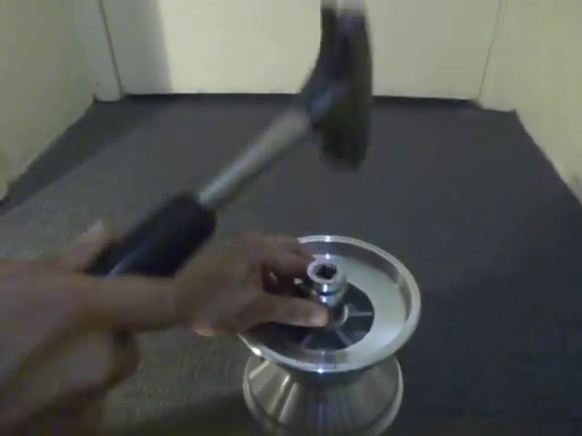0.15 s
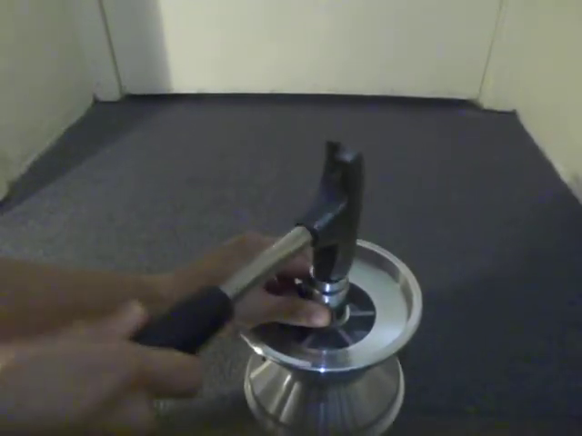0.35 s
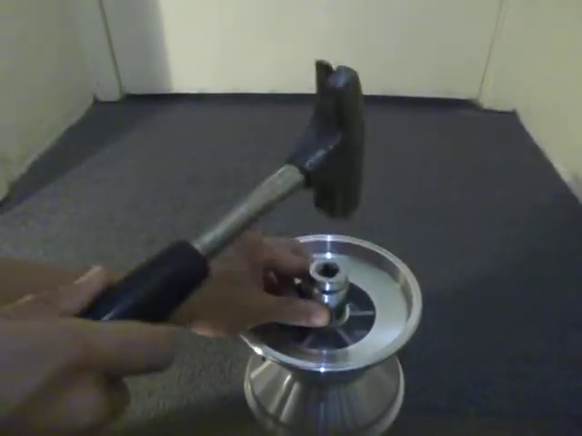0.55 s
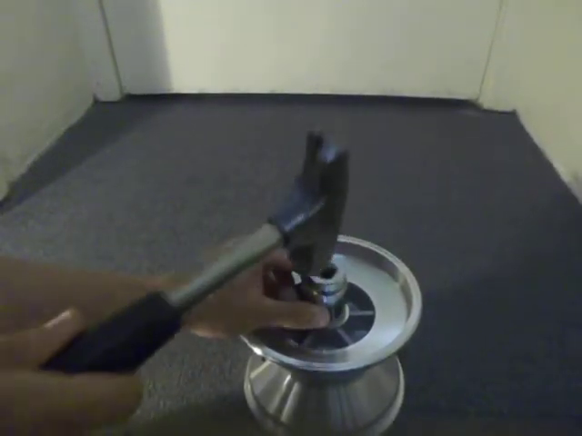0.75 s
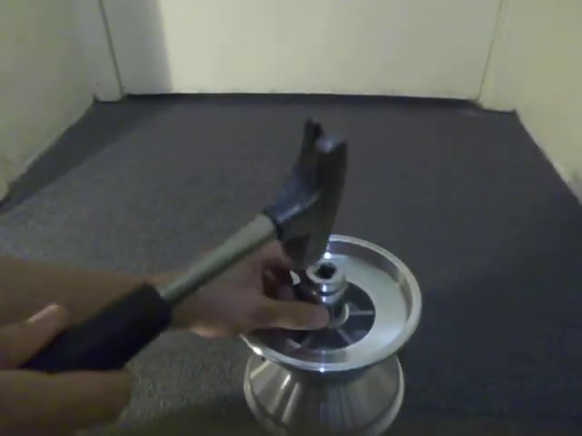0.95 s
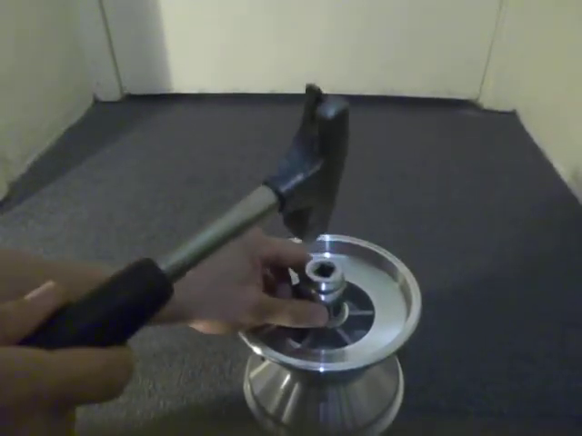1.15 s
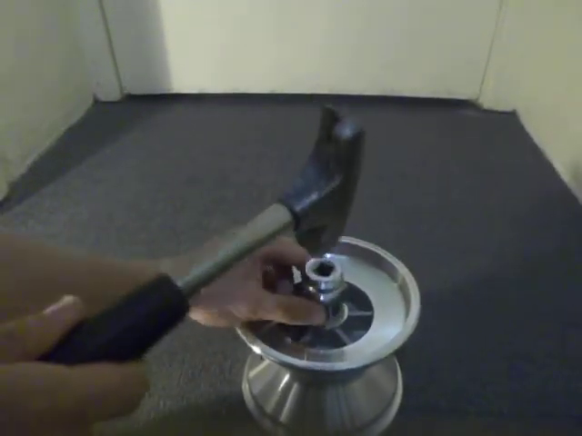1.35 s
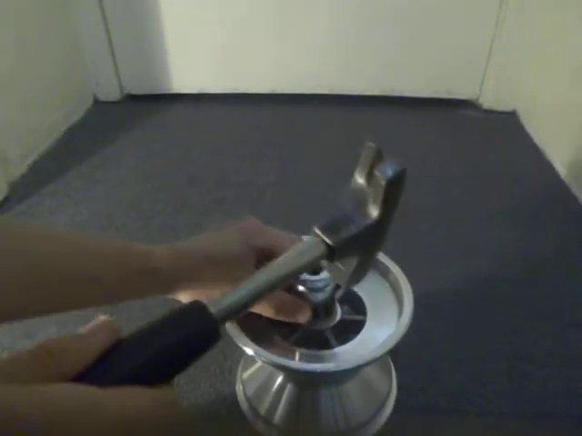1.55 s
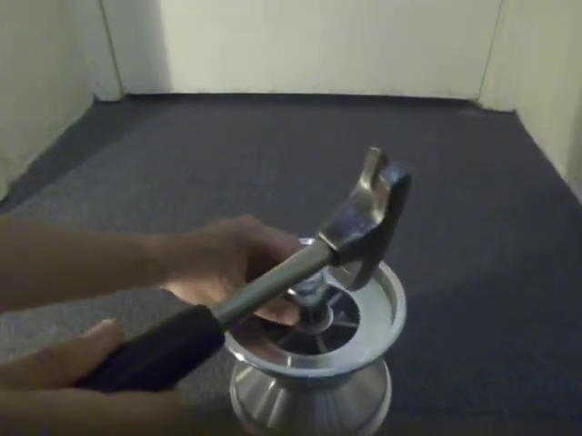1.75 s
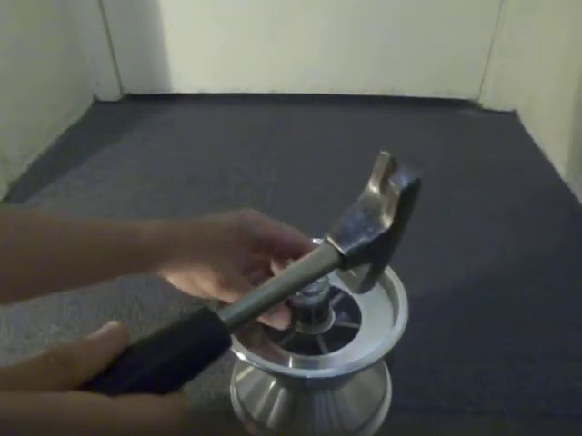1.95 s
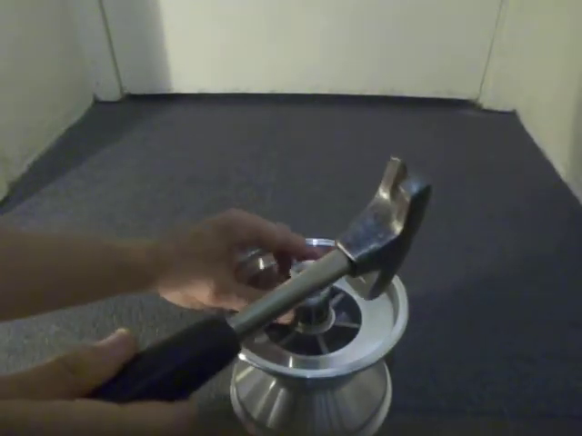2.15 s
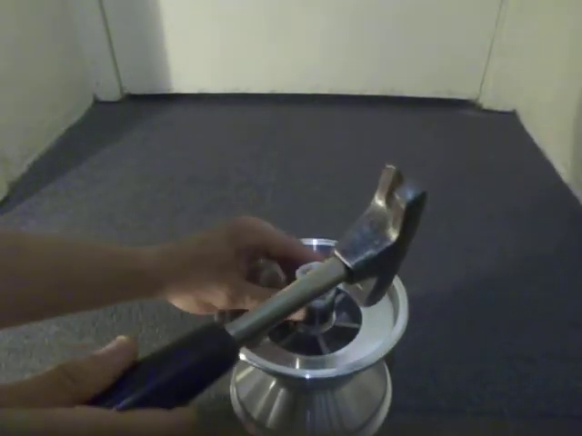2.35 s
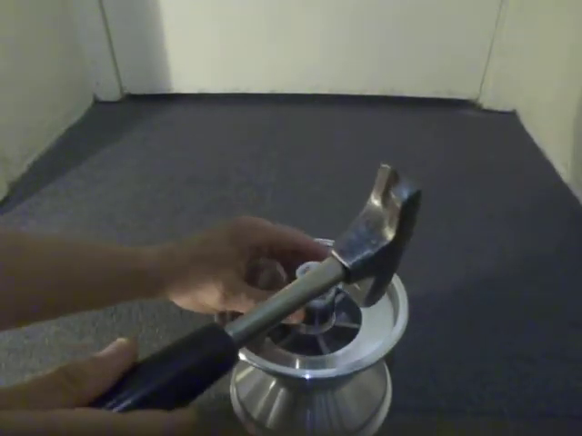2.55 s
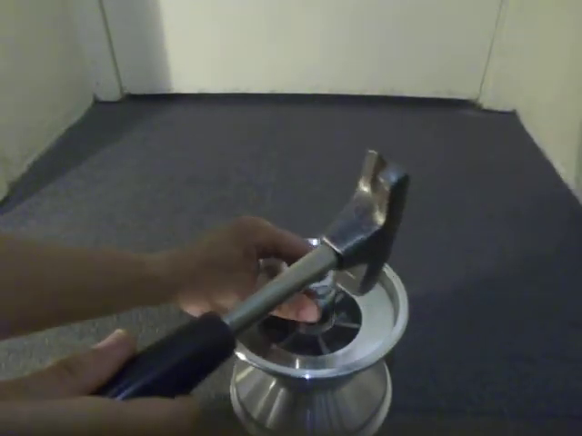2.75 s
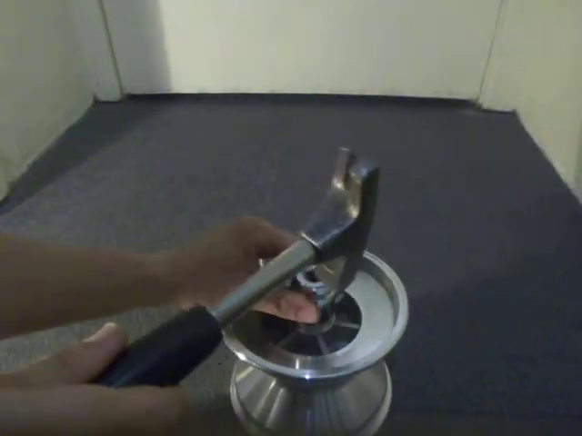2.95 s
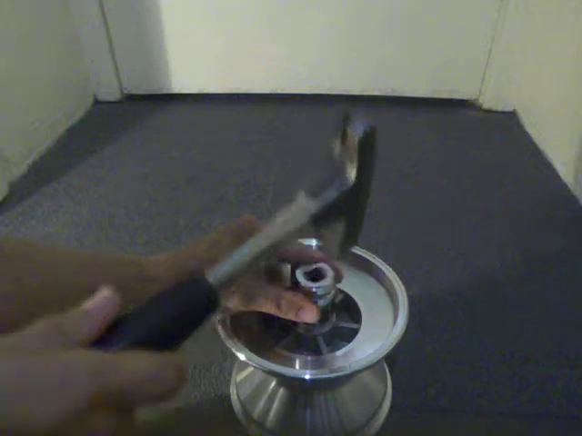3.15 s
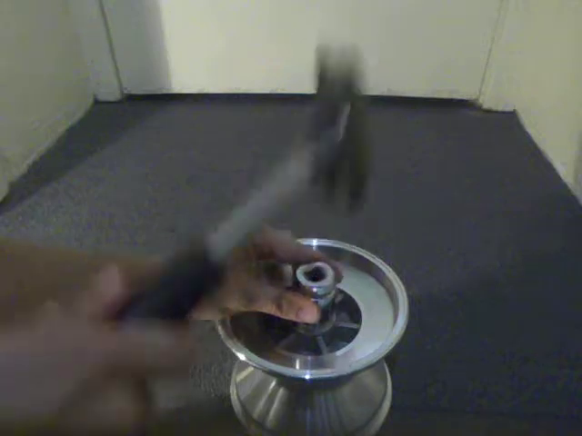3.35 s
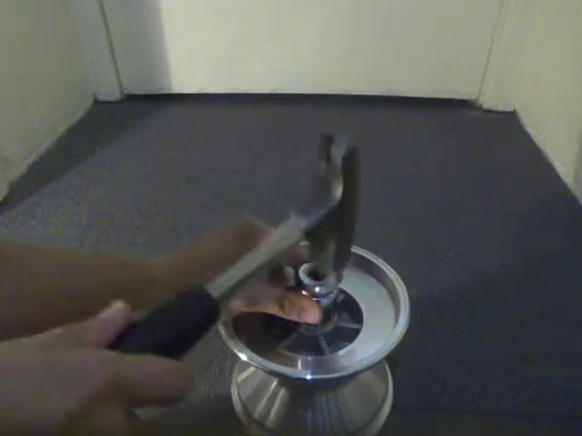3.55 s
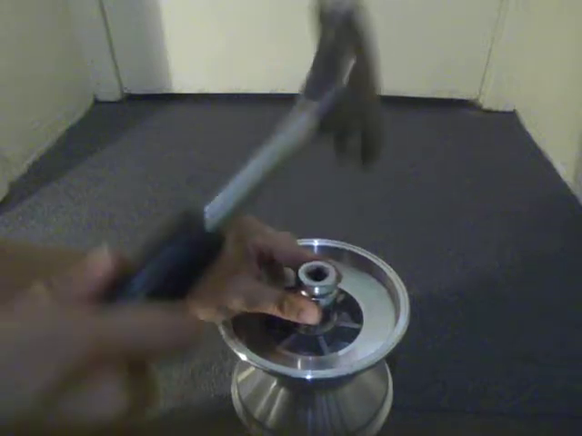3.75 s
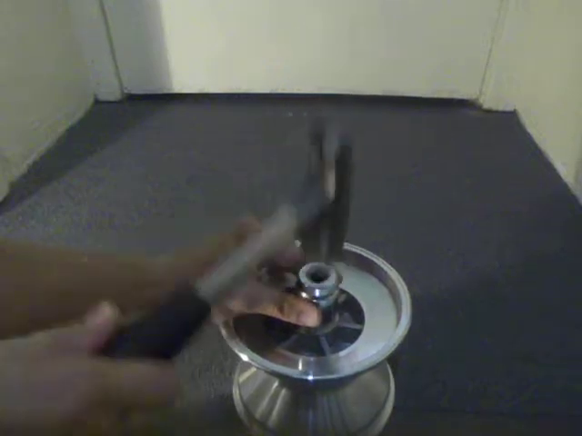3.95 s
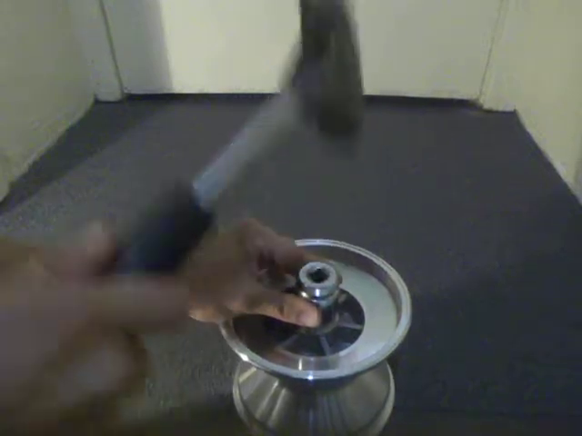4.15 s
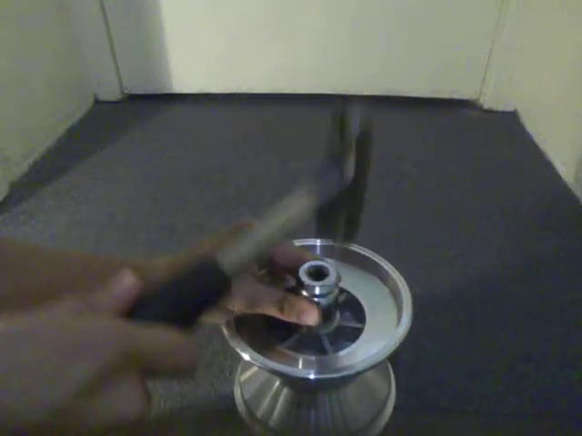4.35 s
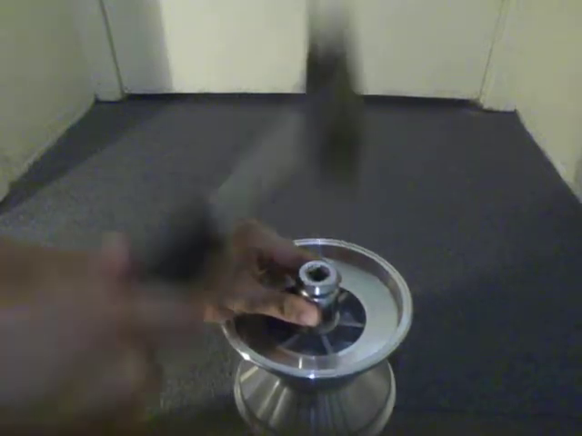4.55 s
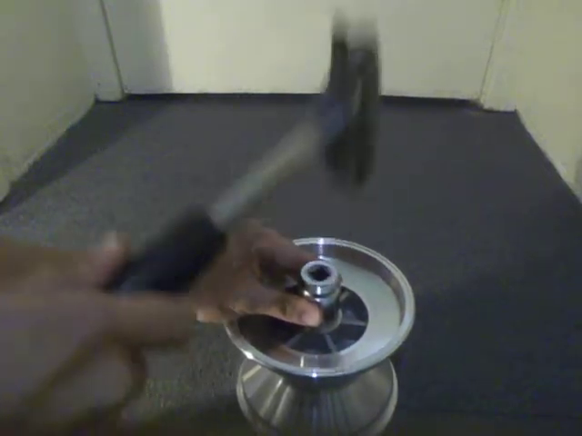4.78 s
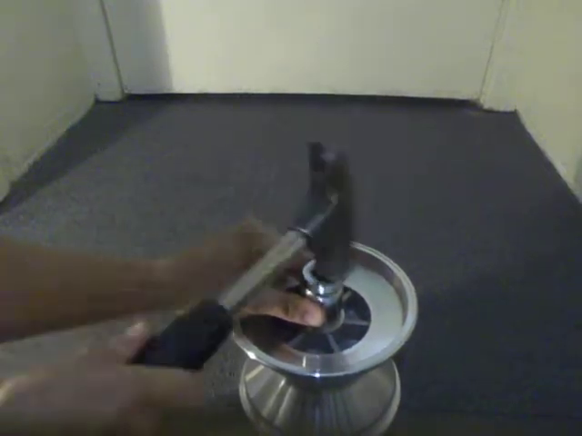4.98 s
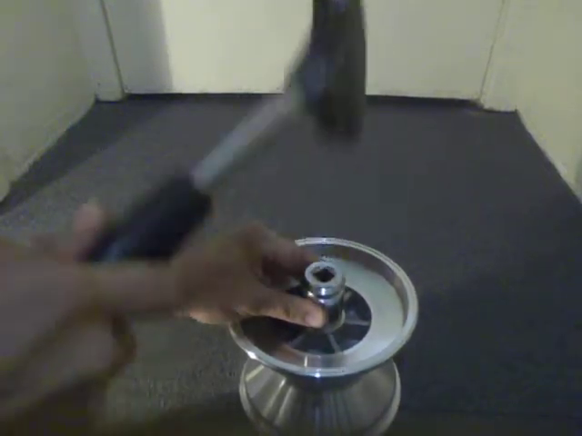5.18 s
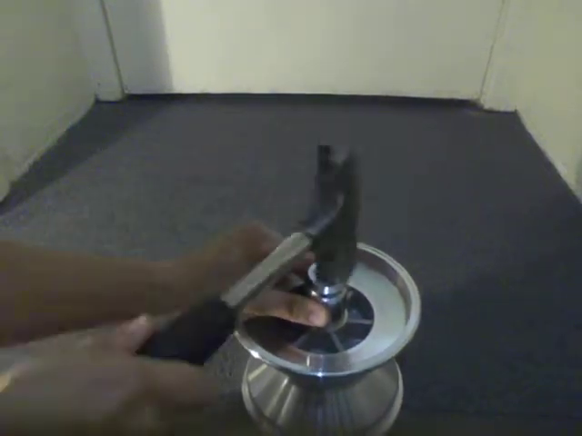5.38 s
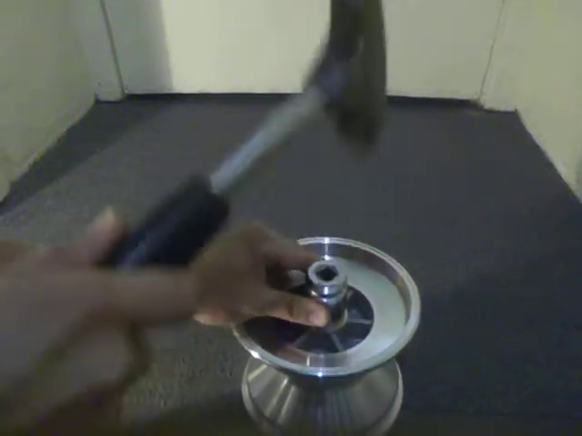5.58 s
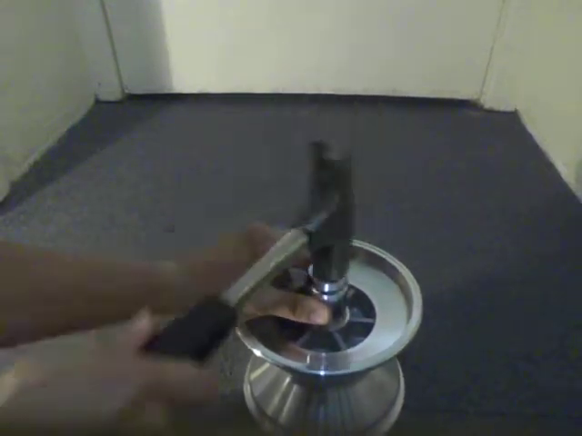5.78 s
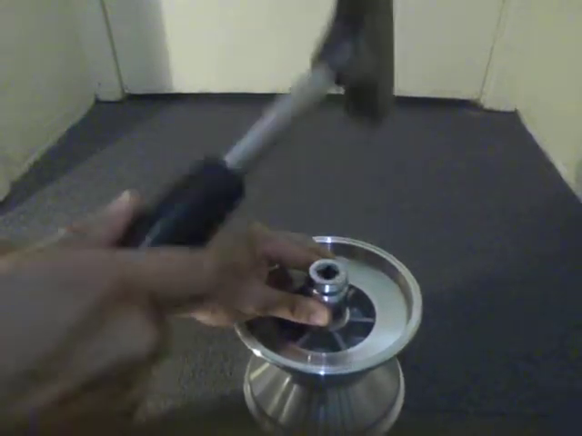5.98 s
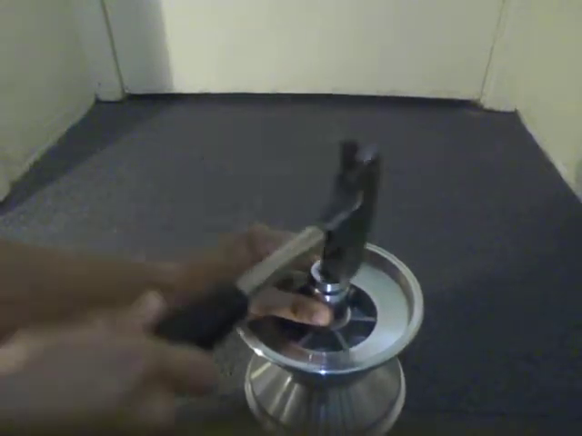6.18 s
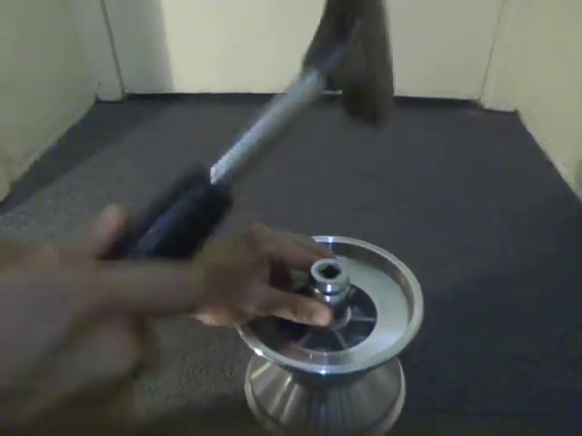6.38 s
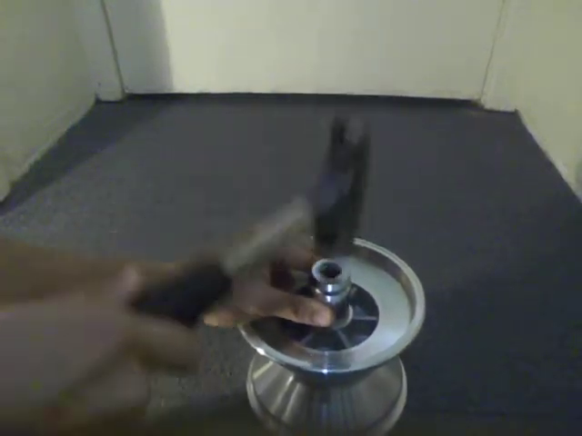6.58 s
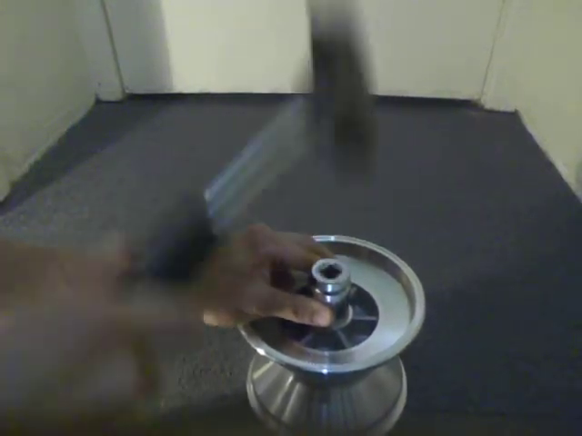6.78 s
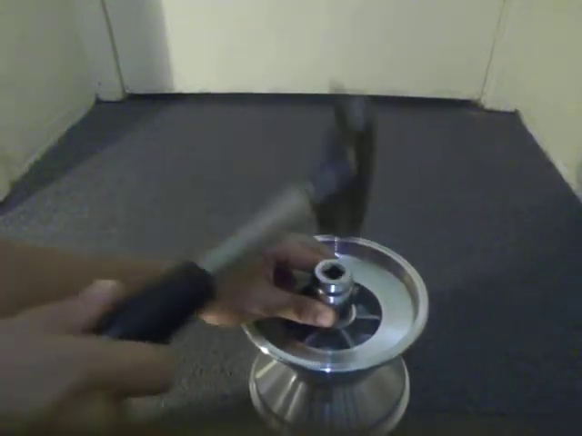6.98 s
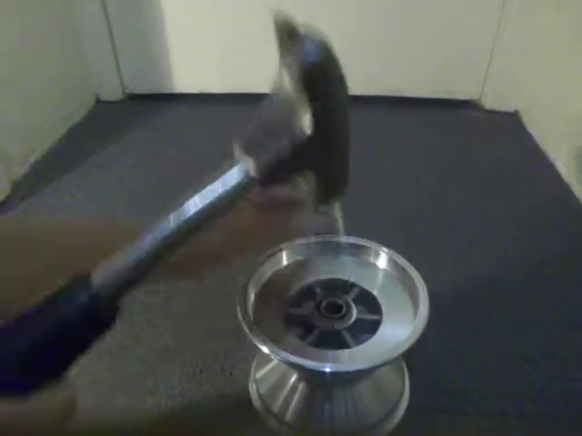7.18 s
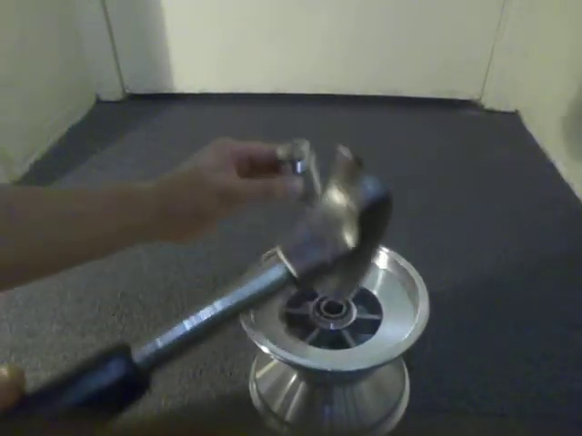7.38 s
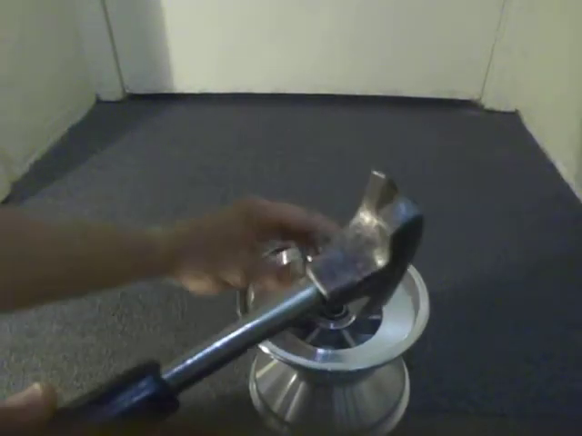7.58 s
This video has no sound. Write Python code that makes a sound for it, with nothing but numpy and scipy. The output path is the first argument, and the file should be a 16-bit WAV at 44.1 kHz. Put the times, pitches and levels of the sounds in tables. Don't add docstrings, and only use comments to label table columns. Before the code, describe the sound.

A single sharp steel clang rings and dies in a small corridor. Small dull knocks, faint rubbing and ticks follow for a few seconds. Then hammering resumes, ten hard bright blows nearly three a second, each doubled by the wheel landing. After a brief pause comes one thin shimmering clink. Sound is close, mono, crunchy and bass-light, with low hiss and a faint whine.

```python
import sys
import numpy as np
from scipy import signal
from scipy.fft import rfft, irfft
from scipy.io import wavfile

SR = 44100
rng = np.random.default_rng(int(sys.argv[2]) if len(sys.argv) > 2 else 0)


def nominal_scale(level):
    x = np.asarray(level, float) / 20
    return 10 ** x


def wrap_up_sound(samples):
    columns = np.atleast_2d(samples).T
    tamed = np.clip(columns, -1, 1)
    steps = np.round(tamed * 32767).astype(np.int16)
    wavfile.write(sys.argv[1], SR, steps)


N = 336042
LEAD_S = .3


def ring(x, hz, t60):
    shrink = nominal_scale(-60 / (max(t60, .003) * SR))
    turn = 2 * np.pi * hz / SR
    return signal.lfilter([0, np.sin(turn)], [1, -2 * shrink * np.cos(turn), shrink ** 2], x + 1e-18)


def at_hz(points, hz):
    point_hz, value = np.array(points).T
    return np.interp(np.log(hz + 1), np.log(point_hz), value)


def coloured(x, spectrum):
    gain = nominal_scale(at_hz(spectrum, np.fft.rfftfreq(len(x), 1 / SR)))
    y = irfft(rfft(x) * gain, len(x))
    return y / np.sqrt(np.mean(y ** 2))


def empty_track():
    return np.zeros(N + round(LEAD_S * SR))


def add(track, s, sound):
    i = round((s + LEAD_S) * SR)
    track[i:i + len(sound)] += sound[:len(track) - i]


def contact(knock_hz, knock_db, ring_db, crack_db, knock_t60, spread=.14, partials=None):
    # f/Hz, level/dB, t60/s
    free_rim = [(2403, -24, 0.04), (2950, -12, 0.015), (3040, -10, 0.025), (3135, -11, 0.04),
                (3235, -6, 0.045), (3305, 1, 0.055), (3384, -8, 0.04), (3392, -10, 0.013),
                (4400, -38.5, 0.072), (5100, -24, .04)]
    # f/Hz, level/dB per Hz
    crack_spectrum = [(40, -4), (130, -25), (300, -16), (600, -3.5), (1500, -6.5), (2000, -13), (2600, -7),
                      (3600, -13), (4500, -17.5), (5600, -6)]
    if partials is None:
        partials = free_rim
    t = np.arange(int(.25 * SR)) / SR
    click = (t == 0) * 1.

    knock = 0
    for side, db, sign in [(-1, -4.5, -1), (0, -0.22, 0.76), (1, -3.0, -1)]:
        knock = knock + sign * nominal_scale(db) * ring(click, knock_hz * (1 + side * spread), knock_t60)

    rim = 0
    for k, (hz, db, t60) in enumerate(partials):
        strength_db = db + 2.0 * rng.standard_normal()
        rim = rim + (-1) ** k * nominal_scale(strength_db) * ring(click, hz, t60)
    rim = rim * (1 - np.exp(-t / .007))

    crack = coloured(np.roll(click, 24), crack_spectrum)
    crack = crack * np.minimum(t / .0005, 1) * np.exp(-t / .012)
    return nominal_scale(knock_db) * knock + nominal_scale(ring_db - 6.0) * rim, nominal_scale(crack_db - 26.5) * crack


def hallway(diffuse_db, standing_db, shorten):
    # f/Hz, t60/s
    hall_t60 = [(100, .72), (260, 0.53), (700, .36), (1800, 0.38), (3300, 0.37), (4500, 0.34), (6000, 0.3)]
    # f/Hz, level/dB, t60/s
    standing = [(136, 2, .55), (186, 1, .5), (321, 9, .5), (624, -3, .38), (901, -6, .32), (1034, -6, .32),
                (1142, -5, .32), (1269, -7, .3), (2405, -9, .4), (3306, -5, .36), (5095, -4, .3)]
    t = np.arange(int(.7 * SR)) / SR
    click = (t == 0) * 1.
    noise = rng.standard_normal((2, len(t)))

    tail = 0
    edges = 60 * 2 ** np.arange(0, 7.1, .7)
    for k, (lo, hi) in enumerate(zip(edges, edges[1:])):
        band = signal.butter(2, [lo, hi], "band", fs=SR, output="sos")
        t60 = shorten * at_hz(hall_t60, np.sqrt(lo * hi))
        tail = tail + signal.sosfilt(band, noise[k % 2]) * nominal_scale(-60 * t / t60)
    tail = tail * (1 - np.exp(-t / 0.0009))

    waves = sum(nominal_scale(db) * ring(click, hz, t60) * (-1) ** k for k, (hz, db, t60) in enumerate(standing))
    return click + nominal_scale(diffuse_db) * tail + nominal_scale(standing_db) * waves


def hammer_blows():
    # t/s, hub knock level/dB, hub knock f/Hz, rim level/dB, socket clang f/Hz
    blows = [(-.21, -11.5, 900, 6, 3280), (.170, 2, 971, 10, 3274), (3.291, 0, 1136, -7.5, 3265),
             (3.714, -3.5, 1034, 8.5, 3046), (4.112, 1.5, 954, 10, 3170), (4.487, 4, 1040, 0.5, 3420),
             (4.856, -2, 956, 5, 3315), (5.244, 2, 1136, 8.5, 3293), (5.623, 3.5, 941, 0, 3456),
             (5.997, 3, 1076, 1.5, 3072), (6.362, 3, 1032, 12, 3420), (6.723, 5, 1087, 7, 3344)]
    crack_db, knock_t60 = 9.5, 0.022
    clang_db, clang_t60 = 3, .016
    rebound_s, rebound_scatter_s, rebound_db, rebound_pitch = .04, .003, -4, .93

    track = empty_track()
    paths = [hallway(-21.5, -47.5, 0.94) for blow in blows]
    for k, (s, knock_db, hz, ring_db, clang_hz) in enumerate(blows):
        wheel, crack = contact(hz, knock_db, ring_db, crack_db, knock_t60)
        click = np.arange(len(crack)) == 0
        crack = crack + nominal_scale(clang_db) * ring(click, clang_hz, clang_t60)
        heard = signal.fftconvolve(wheel, paths[k]) + signal.fftconvolve(crack, paths[k - 1])
        add(track, s, nominal_scale(2.5) * heard)

        landing, thump = contact(hz * rebound_pitch, knock_db, ring_db - 6.5, crack_db - 10, knock_t60)
        landed = signal.fftconvolve(landing + thump, paths[k - 2])
        landing_s = s + rebound_s + rebound_scatter_s * rng.standard_normal()
        add(track, landing_s, nominal_scale(4 + rebound_db) * landed)
    return track


def graze(length_s):
    count = int(length_s * SR)
    return rng.standard_normal(count) * np.hanning(count) / np.sqrt(count / 3)


def nudges():
    # t/s, peak level/dB, rim relative level/dB, knock f/Hz
    touches = [(0.551, -31.5, -29, 1180), (0.558, -27.5, -16, 1192), (0.575, -27, -12.5, 1234),
               (0.627, -34.5, -15, 1162), (0.645, -38, -17, 1218), (0.683, -43, -29, 1160),
               (0.876, -53, -25, 1190), (0.98, -44, -25, 1270), (0.999, -42, -14, 1260),
               (1.264, -53, -24, 1110), (1.81, -55, -17, 1045), (2.042, -51, -30, 1050),
               (2.101, -49, -29, 1170), (2.123, -37, -13, 1173), (2.139, -35.5, -12, 1135),
               (2.172, -38, -7, 1190), (2.19, -32, -5, 1200), (2.208, -37.5, -15, 1146),
               (2.247, -38.5, -12, 1190), (2.599, -38, -8.5, 1240), (2.604, -45, -17, 1244),
               (2.619, -42, 5, 1240), (2.642, -47, -13, 1080), (7.003, -37, -13, 1240)]
    # f/Hz, level/dB, t60/s
    held_rim = [(3280, -2.5, 0.049), (3257, -3, .05), (3090, -5, .03), (2430, -17, 0.036),
                (314, -12.5, 0.037)]
    graze_s, tick_db, knock_t60, spread = .007, 2.5, .05, .06
    dull = signal.butter(4, 2800, fs=SR, output="sos")

    track = empty_track()
    for s, peak_db, ring_db, hz in touches:
        wheel, crack = contact(hz, 0, ring_db + 16, tick_db, knock_t60, spread, held_rim)
        thud = signal.sosfilt(dull, crack)
        touch = signal.fftconvolve(wheel + thud, graze(graze_s))
        add(track, s - graze_s / 2, nominal_scale(peak_db) * touch / np.abs(touch).max())
    return track + signal.fftconvolve(track, hallway(-27, -58, 0.6))[:len(track)] - track


def clink():
    # f/Hz, level/dB, t60/s, sign
    split_rim = [(3290, 0, .19, 1), (3309.5, 0, .19, -1), (3233, -11, .2, 1), (3385, -15, .08, -1),
                 (3172, -20, .15, 1), (3106, -17, .06, -1), (3030, -21, .1, 1), (2405, -25, .3, 1)]
    click = (np.arange(SR // 4) == 0) * 1.
    beat = sum(sign * nominal_scale(db) * ring(click, hz, t60) for hz, db, t60, sign in split_rim)
    wheel, crack = contact(1275, 0, -14, 8, .02)
    tap = nominal_scale(-10.5) * (wheel + crack)
    echoing = signal.fftconvolve(tap, hallway(-28, -50.0, 0.77))[:len(click)]
    track = empty_track()
    add(track, 7.5563, nominal_scale(-3.9) * (beat + echoing))
    return track


def small_microphone(track):
    high_pass = signal.butter(3, 130, "high", fs=SR, output="sos")
    return signal.sosfilt(high_pass, track)[round(LEAD_S * SR):]


def rustle():
    # start t/s, length/s, pressure level/dB
    strokes = [
        (.85, .2, -70),
        (1.2, 0.38, -66),
        (2.05, 0.26, -71),
    ]
    # f/Hz, width/Hz, level/dB
    rubbed = [(1610, 16, 2), (2520, 20, -1), (4590, 40, 0), (1350, 60, -2)]
    attack_s, release_s, idle_db = .05, .12, -76
    t = np.arange(N) / SR
    noise = rng.standard_normal(N)
    broad = signal.lfilter(*signal.iirpeak(1150, 1.6, fs=SR), noise)
    thin = 0
    for hz, width, db in rubbed:
        thin = thin + nominal_scale(db) * signal.lfilter(*signal.iirpeak(hz, hz / width, fs=SR), noise)

    pressure_db = np.full(N, float(idle_db))
    for s, length, db in strokes:
        corners = [s - attack_s, s, s + length, s + length + release_s]
        pressure_db = np.maximum(pressure_db, np.interp(t, corners, [idle_db, db, db, idle_db]))
    singing_db = -66.5 + 3.5 * (pressure_db + 65.5)
    return nominal_scale(pressure_db) * broad / broad.std() + nominal_scale(singing_db) * thin / thin.std()


def squeaks():
    # t/s, f/Hz, level/dB, length/s
    whistles = [
        (1.841, 4800, -66, 0.011),
        (7.058, 4740, -61, 0.019),
    ]
    t = np.arange(N) / SR
    total = np.zeros(N)
    for s, hz, db, length in whistles:
        swell = np.exp(-.5 * ((t - s) / length) ** 2)
        total += nominal_scale(db) * np.sin(2 * np.pi * hz * t) * swell
    return total


def recorder_floor():
    # f/Hz, level/dB per Hz
    hiss_spectrum = [(20, -10), (62, -7), (100, -1.5), (160, -1), (400, 1.5), (1100, -1.5), (1800, -6),
                     (3500, -9), (4800, -9), (7000, -14.5)]
    # f/Hz, rms level/dB
    hum_and_whine = [(44.6, -65), (89.2, -77), (100, -74), (4969, -75)]
    t = np.arange(N) / SR
    tones = np.zeros(N)
    for (hz, db), drift in zip(hum_and_whine, [.004, .008, .006, .003]):
        waver = drift * np.cumsum(rng.standard_normal(N))
        tones += np.sqrt(2) * nominal_scale(db) * np.sin(2 * np.pi * hz * t + waver)
    hiss = coloured(rng.standard_normal(N), hiss_spectrum + [(7500, -81)])
    return nominal_scale(-62.5) * hiss + tones


def scene():
    wheel = small_microphone(hammer_blows() + nudges() + clink())
    return (wheel + rustle() + squeaks() + recorder_floor())[None]


def band_limit(x):
    return signal.sosfilt(signal.butter(12, 16830, fs=SR, output="sos"), x)


def record(dry):
    full_scale, offset = .707, .0107
    low = signal.resample_poly(dry[0], 1, 4, window=signal.firwin(129, 5900, fs=SR))
    low = np.clip(low + offset, -full_scale, full_scale)
    smooth = signal.firwin(129, 5350, window=("kaiser", 9), fs=SR)
    high = signal.resample_poly(low, 4, 1, window=smooth, padtype="edge")[:N]
    high = np.clip(high, -full_scale, full_scale)
    top_cut = signal.ellip(12, .1, 30, 15750, fs=SR, output="sos")
    mix = signal.sosfiltfilt(top_cut, high)[None]
    return band_limit(mix)


dry = scene()
out = record(dry)
wrap_up_sound(out)
```